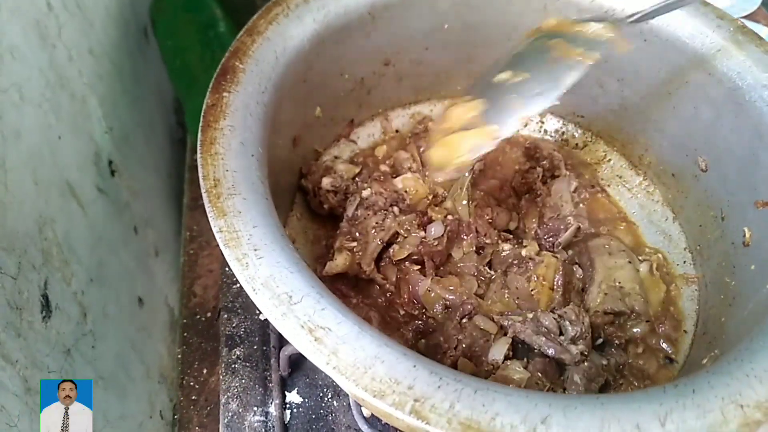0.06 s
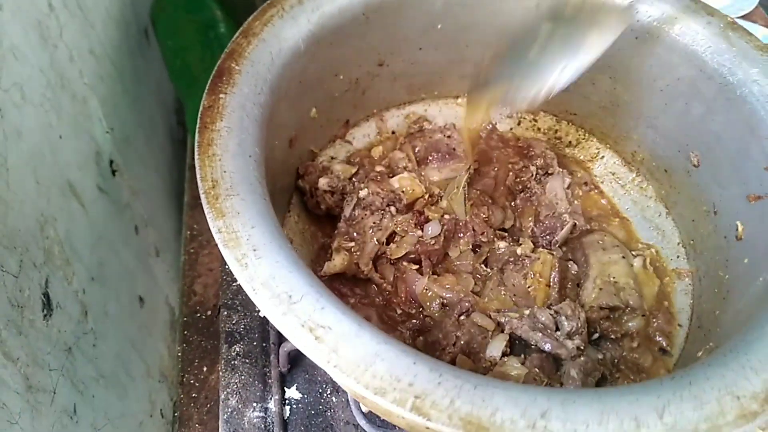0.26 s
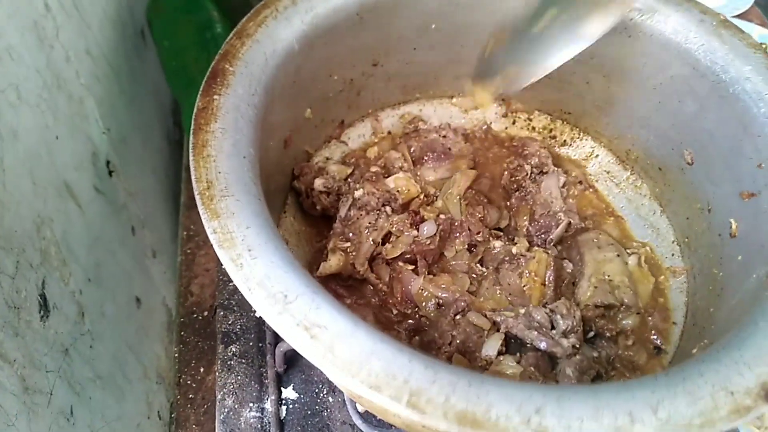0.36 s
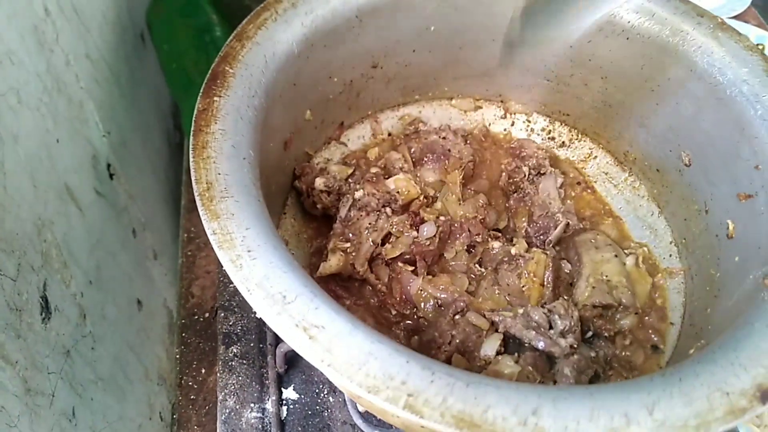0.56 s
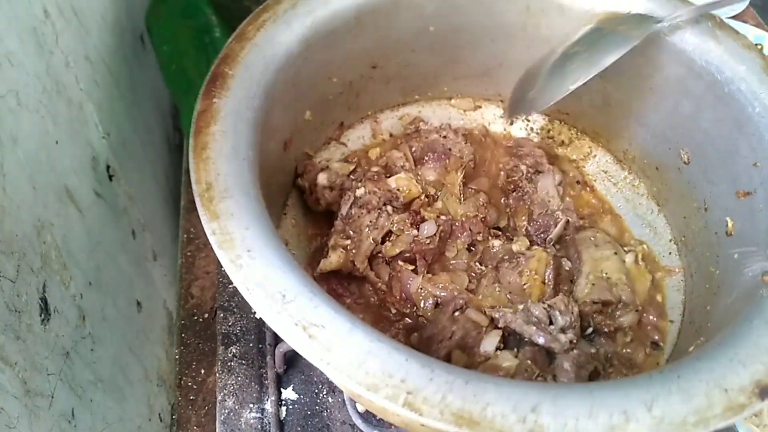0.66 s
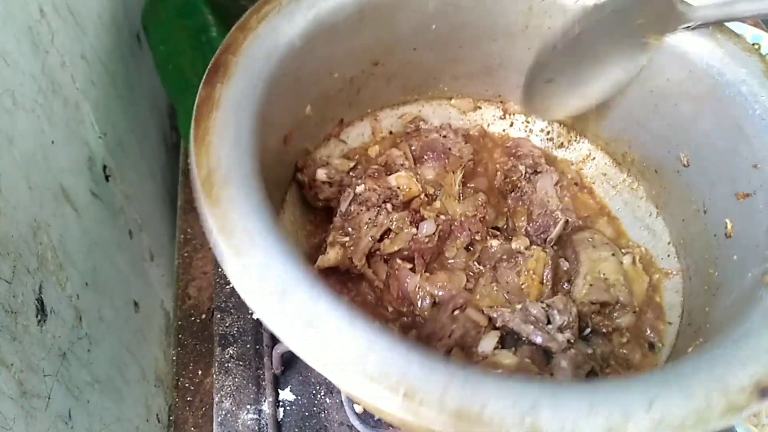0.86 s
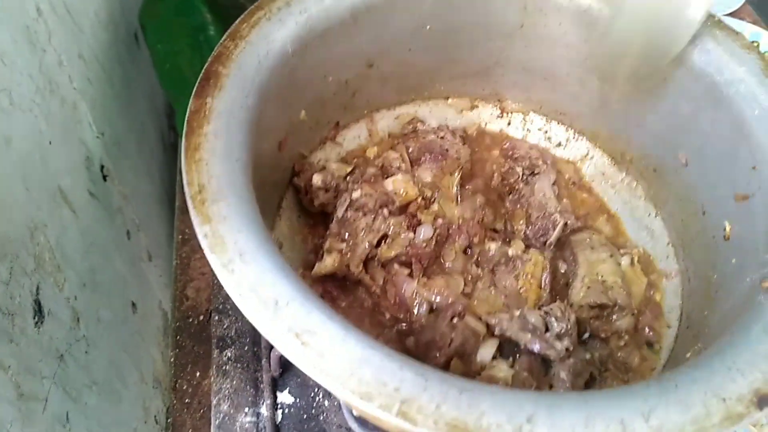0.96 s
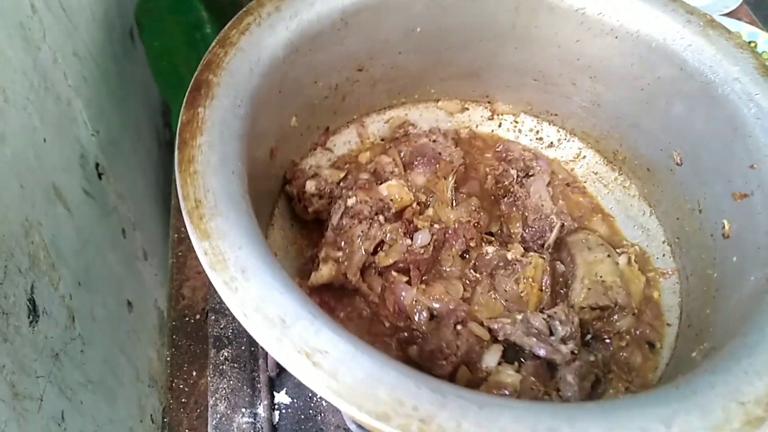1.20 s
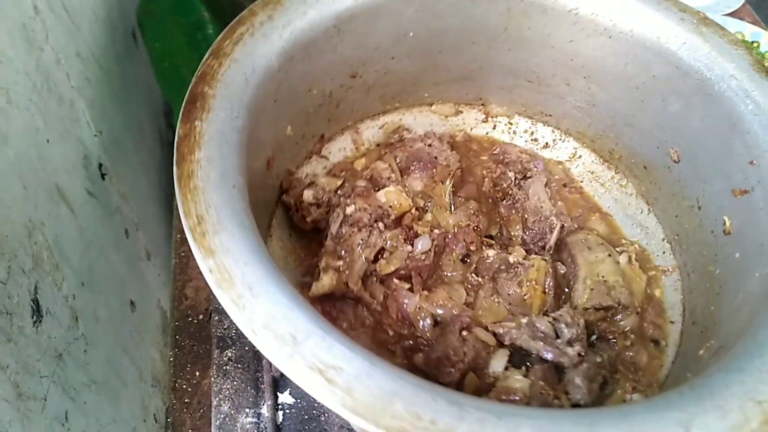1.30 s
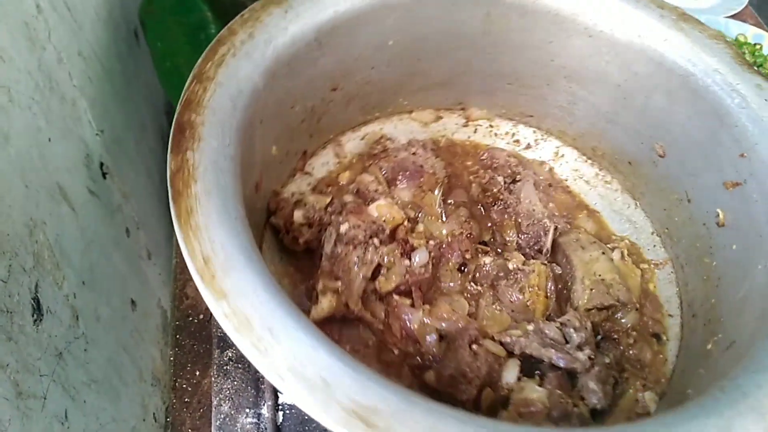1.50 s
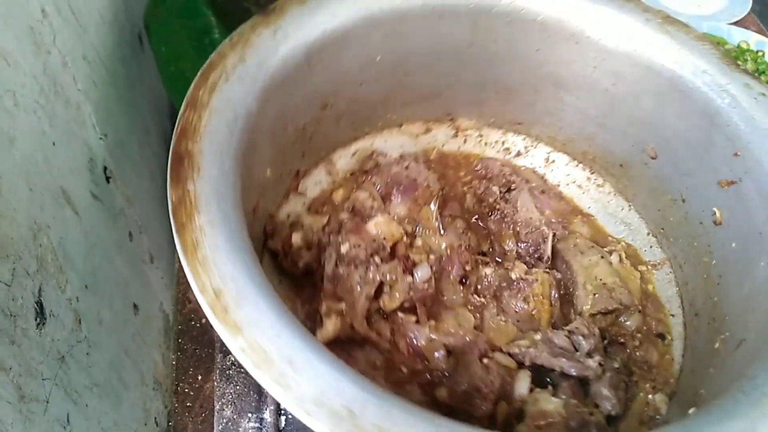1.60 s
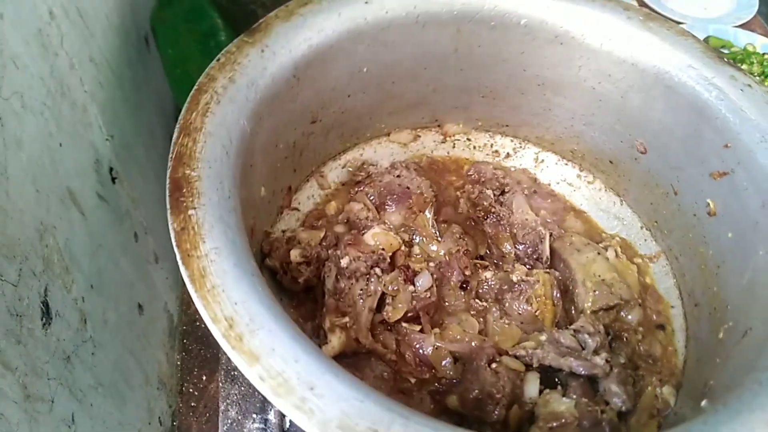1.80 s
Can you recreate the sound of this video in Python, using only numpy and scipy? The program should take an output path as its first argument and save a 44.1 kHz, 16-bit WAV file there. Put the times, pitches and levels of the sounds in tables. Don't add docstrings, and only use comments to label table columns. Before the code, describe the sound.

A metal ladle knocks four times on an aluminium pot rim, clanging over faint sizzling fat

```python
import sys
import numpy as np
from scipy import signal
from scipy.fft import rfft, irfft, next_fast_len
from scipy.io import wavfile
from scipy.ndimage import uniform_filter1d

SR = 44100
rng = np.random.default_rng(int(sys.argv[2]) if len(sys.argv) > 2 else 0)


def wav_record(signal):
    frames = np.transpose(np.atleast_2d(signal))
    bounded = np.clip(frames, -1, 1)
    quanta = np.round(bounded * 32767).astype(np.int16)
    wavfile.write(sys.argv[1], SR, quanta)


def decibels_to_gain(level_db):
    exponent = np.asarray(level_db, float) / 20
    return 10 ** exponent


N = 81585
SIDE = np.array([[.5], [-.5]])


def unit(x):
    return x / np.sqrt(np.mean(x ** 2) + 1e-20)


def along(points, hz):
    f, v = np.transpose(points)
    return np.interp(np.log(hz + 1), np.log(f + 1), v)


def filtered(x, response):
    n = x.shape[-1]
    m = next_fast_len(n + 8192)
    return irfft(rfft(x, m) * response(np.fft.rfftfreq(m, 1 / SR)), m)[..., :n]


def smooth(x, bands, frames):
    return uniform_filter1d(uniform_filter1d(x, size=bands, axis=-2), size=frames, axis=-1)


def add(out, start_s, x):
    start = round(start_s * SR)
    out[..., start:start + x.shape[-1]] += x


# pitch_hz, likeness (0 to 1)
PORT_LIKENESS = [(100, 0.96), (400, 0.91), (800, 0.14), (2000, 0.074), (5000, 0.1), (12000, 0.033)]


def ports(pair):
    def shares(hz):
        angle = np.arccos(np.clip(along(PORT_LIKENESS, hz), -1, 1)) / 2
        return np.array([np.cos(angle), np.sin(angle)])

    mid, side = filtered(pair, shares)
    return np.array([mid + side, mid - side])


# time_s, level_db
SIZZLE_LEVEL = [(0.0, -46), (0.236, -46), (0.354, -43), (0.664, -43), (0.834, -38.5), (1.05, -44),
                (1.85, -47.5)]
# pitch_hz, density_db_per_hz
FAT_COLOUR = [(50, -10.5), (110, -5.5), (170, -16.5), (340, -14), (700, -18.5), (2000, -15), (2400, -7.5),
              (5650, -1.5), (14000, -22)]
# pitch_hz, strength (share of direct sound)
FLOOR_ECHO = [(600, .1), (1200, .3), (2000, .5), (3000, .55), (5000, .2), (7000, .08)]
# pitch_hz, loss_db
FAT_RIGHT_LOSS = [(2400, -2), (2720, 12), (3100, 3), (4600, -3), (5850, 2), (6800, -2), (8000, -2),
                  (10000, -6)]
# time_s, boost_db
MID_BAND_BOOST = [(0, 1.5), (1.6, -1.5), (1.72, -7), (1.85, -5)]
# start_s, level_db
LOUD_SPITS = [
    (1.427, -40),
    (1.545, -45),
    (1.64, -46),
    (1.802, -46),
]
SPITS_PER_S, SPIT_DB, HISS_DB, PATCH_DB = 1800, 1.5, 0, 4
MID_BAND_HZ, MID_BAND_OCT = 3200, .3
ECHO_S, RIGHT_ECHO = 1 / 563, .6
FAT_LAG_S, AIR_HZ = -.0003, 14300


def sizzle():
    struck = rng.random((2, N)) < SPITS_PER_S / SR
    spits = struck * rng.standard_normal((2, N)) * decibels_to_gain(SPIT_DB * rng.exponential(size=(2, N)))
    fat = ports(unit(spits) + decibels_to_gain(HISS_DB) * rng.standard_normal((2, N)))

    hz, frames, z = signal.stft(fat, SR, nperseg=512)
    octaves = np.log2((hz[:, None] + 1) / MID_BAND_HZ)
    mid_band_db = np.exp(-(octaves / MID_BAND_OCT) ** 2) * np.interp(frames, *np.transpose(MID_BAND_BOOST))
    patches = PATCH_DB * unit(smooth(rng.standard_normal(z.shape), 4, 12))
    fat = signal.istft(z * decibels_to_gain(patches + mid_band_db), SR, nperseg=512)[1][:, :N]

    def pot(hz):
        delayed = along(FLOOR_ECHO, hz) * np.exp(-2j * np.pi * hz * ECHO_S)
        comb = (1 + np.array([[1], [RIGHT_ECHO]]) * delayed) ** 2
        return (hz < AIR_HZ) * decibels_to_gain(along(FAT_COLOUR, hz)) * comb

    def place(hz):
        lag = np.exp(2j * np.pi * hz * SIDE * FAT_LAG_S)
        return decibels_to_gain((SIDE - .5) * along(FAT_RIGHT_LOSS, hz)) * lag

    time_s, level_db = np.transpose(SIZZLE_LEVEL)
    level = decibels_to_gain(np.interp(np.arange(N) / SR, time_s, level_db))
    out = unit(filtered(fat, lambda hz: pot(hz) * place(hz))) * level
    t = np.arange(100) / SR
    for start_s, db in LOUD_SPITS:
        add(out, start_s, decibels_to_gain(db - 60 * t / .002) * np.sin(2 * np.pi * 4500 * t))
    return out


# start_s, level_db, pitch_hz
GRAVY_BUBBLES = [(.155, -62, 1070), (1.4, -48.5, 2290), (1.41, -49.5, 1656), (1.505, -57.5, 1567),
                 (1.54, -46.5, 2300), (1.545, -52.5, 1630), (1.585, -55, 2330), (1.61, -49, 2250),
                 (1.645, -52, 2280), (1.665, -60, 2250), (1.668, -57, 1065), (1.73, -51.5, 1670),
                 (1.83, -57, 1616)]
BUBBLE_S, BUBBLE_PAN_DB = .024, -8


def bubbles():
    out = np.zeros(N + SR)
    u = np.linspace(0, 1, round(BUBBLE_S * SR))
    for start_s, db, hz in GRAVY_BUBBLES:
        swell = np.sin(np.pi * u)
        add(out, start_s, decibels_to_gain(db) * swell * np.sin(2 * np.pi * hz * BUBBLE_S * u))
    return out[:N] * decibels_to_gain(BUBBLE_PAN_DB * SIDE)


# start_s, clang_db, thud_db, thud_pitch_hz, brightness_db_per_octave
LADLE_KNOCKS = [
    (0.202, -20, 1.5, 402.2, 1.5),
    (0.4069, -12.5, -1.5, 444, 1.5),
    (0.625, -10, -5.5, 424, 0.5),
    (0.831, -10.5, 4, 445.5, 1),
]
# pitch_hz, density_db_per_hz
CLANG_COLOUR = [(35, -50), (60, -11), (100, -8.5), (250, -6.5), (420, -4.5), (875, -14.5), (2000, -19),
                (5720, -20), (14300, -40)]
# pitch_hz, decay_s
CLANG_DECAY = [(60, 1), (160, 0.72), (340, 0.69), (600, 0.44), (1100, 0.56), (2900, 0.42), (7700, 0.35),
               (15000, 0.29)]
LEAD_S, LEAD_DB = .003, -12
CRACK_DB, CRACK_T60 = 2, .043
SNAP_DB, SNAP_T60, RISE_S = -5, .016, .0003
CLANG_TOP_HZ, GRAIN_DB, GRAIN_FROM_HZ = 13800, 3, 900


def clang():
    out = np.zeros((2, N + SR))
    t = np.arange(SR * 3 // 4) / SR
    lead = t[t < LEAD_S]
    for start_s, db, _, _, bright in LADLE_KNOCKS:
        def colour(hz):
            tilt_db = bright * np.log2((hz + 50) / 2000)
            return (hz < CLANG_TOP_HZ) * decibels_to_gain(along(CLANG_COLOUR, hz) + tilt_db)

        noise = unit(filtered(ports(rng.standard_normal((2, len(t)))), colour))
        hz, frames, z = signal.stft(noise, SR, nperseg=256)
        grain = unit(smooth(rng.standard_normal(z.shape[1:]), 2, 5))
        lumps_db = GRAIN_DB * (hz[:, None] > GRAIN_FROM_HZ) * grain
        fall_db = 60 * frames / along(CLANG_DECAY, hz)[:, None]
        tail = signal.istft(z * decibels_to_gain(lumps_db - fall_db), SR, nperseg=256)[1][:, :len(t)]

        crack = decibels_to_gain(CRACK_DB - 60 * t / CRACK_T60) * noise[:, ::-1]
        add(out, start_s, decibels_to_gain(db) * (tail + crack) * (1 - np.exp(-t / RISE_S)))
        snap = decibels_to_gain(db + SNAP_DB - 60 * t / SNAP_T60) * rng.standard_normal((2, len(t)))
        add(out, start_s, snap)
        scrape = noise[:, 9000:9000 + len(lead)] * lead / LEAD_S
        add(out, start_s - LEAD_S, decibels_to_gain(db + LEAD_DB) * scrape)
    return out[:, :N]


# start_s, level_db, pitch_hz
POT_ROCKS = [(.222, -14.5, 383), (0.242, -13, 293), (.455, -16.5, 367), (0.492, -31.5, 298),
             (0.679, -12.5, 379), (0.714, -11.5, 336), (0.846, -10, 390), (0.869, -18, 348.5),
             (0.904, -11, 238), (.903, -9.5, 417), (0.918, -6.5, 376), (0.943, -12.5, 490),
             (0.964, -21, 294)]
THUD_CYCLES, THUD_RISE = 16.3, 2.64
ROCK_CYCLES, ROCK_RISE = 14.6, 1.1
THUD_LEAD_S = .001


def thuds():
    moves = [(start_s - THUD_LEAD_S, thud_db + 1.85, hz, THUD_CYCLES, THUD_RISE)
             for start_s, _, thud_db, hz, _ in LADLE_KNOCKS]
    moves += [(*rock, ROCK_CYCLES, ROCK_RISE) for rock in POT_ROCKS]
    out = np.zeros(N + SR)
    t = np.arange(SR // 8) / SR
    for start_s, db, hz, life, rise in moves:
        cycles = hz * t
        swell = 1 - np.exp(-(cycles / rise) ** 2)
        add(out, start_s, 2 * decibels_to_gain(db - 60 * cycles / life) * swell * np.sin(2 * np.pi * cycles))
    return out[:N]


# pitch_hz, decay_s (to -60 dB), rise_s
WALL_MODES = [(104, .55, .06), (180, .4, .01), (365, .3, .01), (513, .45, .01), (940, .06, .001),
              (1025, .14, .003), (1080, .07, .001), (1217, .12, .026), (1532, .1, .003), (1612, .1, .003),
              (1681, .1, .003), (2283, .08, .002), (2529, .09, .003), (1208, .4, .004)]
# knock1_db, knock2_db, knock3_db, knock4_db
WALL_DRIVE = [(-27, -25, -16.5, -12), (-24.5, -29.5, -38, -28.5), (-36.5, -23.5, -24, -11),
              (-55.5, -17.5, -42.5, -24), (-20.5, -18.5, -11.5, -14.5), (-24.5, -16, -16, -9),
              (-40.5, -15, -12, -6), (-46, 3.5, 9.5, -2), (-50.5, -40, -12, -14), (-22.5, -13, -5, -16),
              (-36, -13.5, -6.5, -7.5), (-11.5, -21, -42.5, -51), (-46, -11, -51.5, -4.5),
              (-48, -14.5, -15, -23.5)]
# pitch_hz, decay_s (to -60 dB), rise_s
BOWL_MODES = [(3080, .17, .005), (3555, .15, .003), (3833, .14, .002), (4164, .1, .002), (4541, .08, .005),
              (4930, .06, .002), (5280, .05, .001), (5520, .06, .001), (5778, .075, .001),
              (6000, .04, .001), (6385, .07, .001), (5093, .05, .002), (7600, .05, .002)]
# knock1_db, knock2_db, knock3_db, knock4_db
BOWL_DRIVE = [(-46, -45, -38, -10), (-47.5, -27.5, -33, -18), (-37, -45.5, -38, -15.5),
              (-16, -40.5, -56, -22.5), (-4, -32.5, -11.5, -54), (-21, -32.5, -34, -35.5),
              (-13, -29, -28.5, -15), (-32, -17.5, -23, -10), (-23.5, -9, -9, -30), (-36, -14, -25, -23),
              (-32.5, -12.5, -31, -12.5), (-22.5, -30, -28, -32.5), (-9.5, -26, -31.5, -36.5)]
# pitch_hz, level_db
KITCHEN_LEVEL = [(150, -14), (500, -6), (1200, -8), (3000, -6), (4500, -16), (5500, -12)]
KITCHEN_T60 = .4


def ringing():
    out = np.zeros((2, N + SR))
    t = np.arange(SR * 3 // 4) / SR
    for knock, drive in zip(LADLE_KNOCKS, np.transpose(WALL_DRIVE + BOWL_DRIVE)):
        for (hz, t60, rise), db in zip(WALL_MODES + BOWL_MODES, drive):
            phase = rng.uniform(0, 2 * np.pi)
            swell = 1 - np.exp(-(t / rise) ** 2)
            add(out, knock[0], decibels_to_gain(db - 60 * t / t60) * swell * np.sin(2 * np.pi * hz * t + phase))
    room = ports(rng.standard_normal((2, len(t)))) * decibels_to_gain(-60 * t / KITCHEN_T60)
    room = room / np.linalg.norm(room[0])
    wet = signal.fftconvolve(out, room, axes=1)[:, :N]
    return out[:, :N] + filtered(wet, lambda hz: decibels_to_gain(along(KITCHEN_LEVEL, hz)))


# pitch_hz, threshold_db (against the port's typical treble)
GATE_THRESHOLD = [(1200, -40), (1900, -7), (3500, -7), (8800, -12), (10000, -7.5), (11300, -15),
                  (13300, -10), (14000, -25)]
QUIET_SHARE = 30


def gate(x):
    hz, _, z = signal.stft(x, SR, nperseg=1024)
    power = np.abs(smooth(np.abs(z) ** 2, 4, 5))
    treble = np.median(power[:, (hz > 2000) & (hz < 9000)], axis=1, keepdims=True)
    quiet = np.percentile(treble, QUIET_SHARE, axis=2, keepdims=True)
    typical = np.sqrt(treble * quiet)
    over = power / (typical * decibels_to_gain(2 * along(GATE_THRESHOLD, hz))[:, None] + 1e-20)
    return signal.istft(z / (1 + (over + 1e-9) ** -4), SR, nperseg=1024)[1][:, :N]


def scene():
    return sizzle() + bubbles() + clang() + thuds() + ringing()


# pitch_hz, level_db
PORT_TILT = [(60, -8), (400, -4), (900, -5.5), (2400, -3), (4400, 2.5), (5700, 13), (7500, 8), (15000, 4)]
LAG_S, CLIP_LEVEL = .0002, .99
NOTCH_HZ, NOTCH_WIDE_HZ = 9150, 350
LOW_CUT_HZ, TOP_HZ, EDGE_HZ = 65, 16150, 60


def top_cut(x):
    return signal.sosfilt(signal.butter(12, 16360, fs=SR, output="sos"), x)


def record(dry):
    def port(hz):
        return decibels_to_gain(SIDE * along(PORT_TILT, hz)) * np.exp(2j * np.pi * hz * SIDE * LAG_S)

    def notch(hz):
        return 1 - .7 * np.exp(-((hz - NOTCH_HZ) / NOTCH_WIDE_HZ) ** 2)

    def passband(hz):
        top = .53 - .47 * np.tanh((hz - TOP_HZ) / EDGE_HZ)
        return top / (1 + (LOW_CUT_HZ / (hz + 1)) ** 4)

    left, right = filtered(dry, port)
    x = gate(np.array([left, filtered(right, notch)]))
    x = filtered(x, passband)
    mix = x / (1 + np.abs(x / CLIP_LEVEL) ** 16) ** (1 / 16)
    return top_cut(mix)


dry = scene()
out = record(dry)
wav_record(out)
```